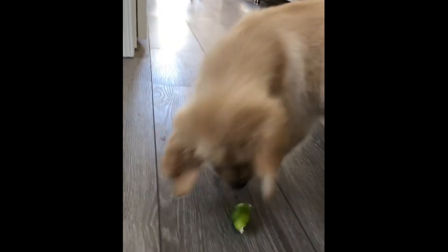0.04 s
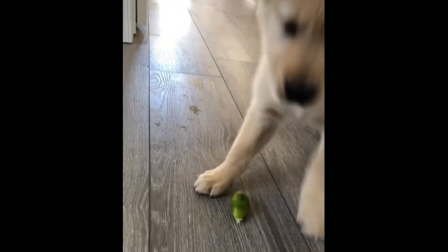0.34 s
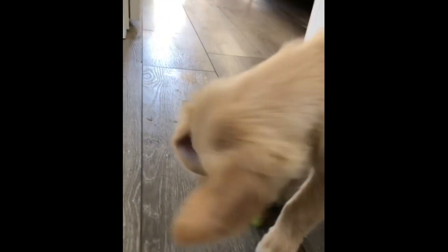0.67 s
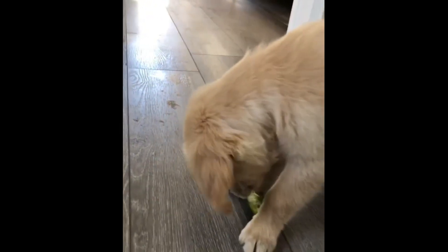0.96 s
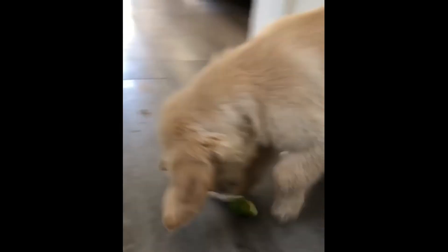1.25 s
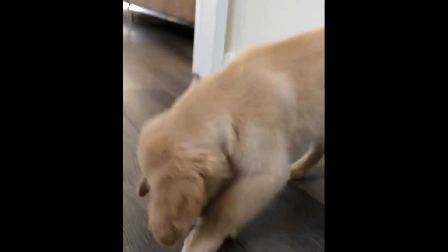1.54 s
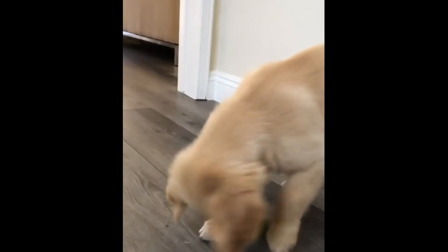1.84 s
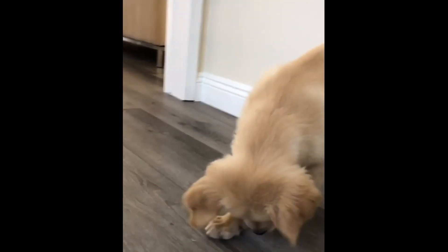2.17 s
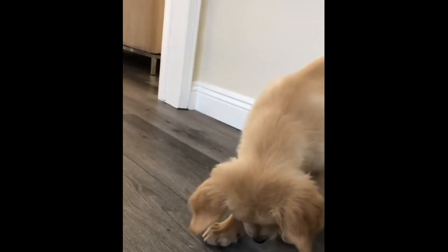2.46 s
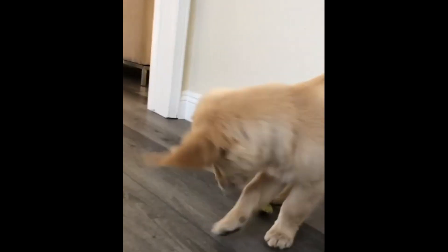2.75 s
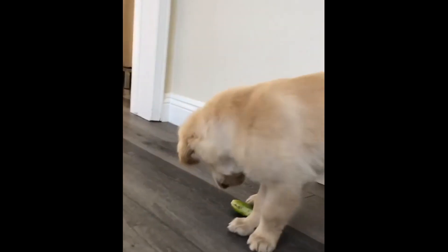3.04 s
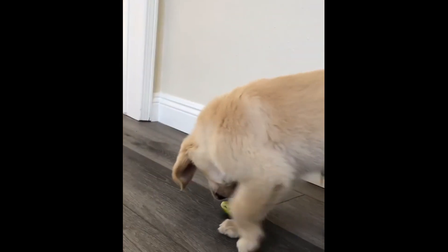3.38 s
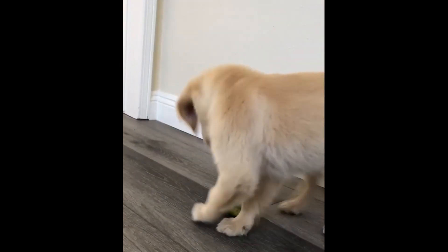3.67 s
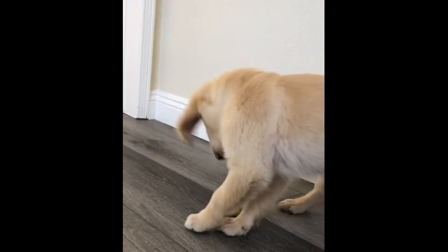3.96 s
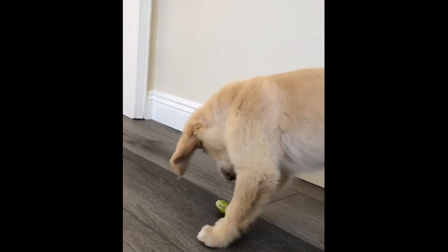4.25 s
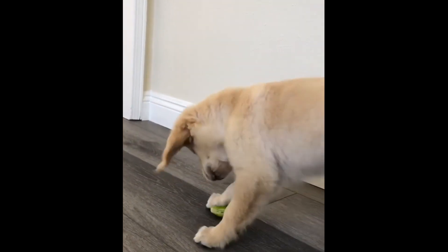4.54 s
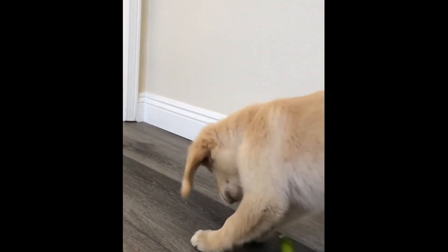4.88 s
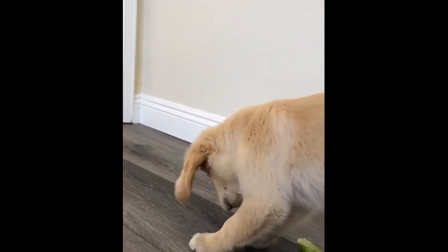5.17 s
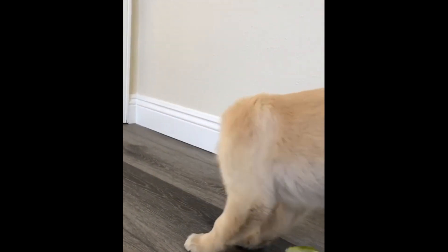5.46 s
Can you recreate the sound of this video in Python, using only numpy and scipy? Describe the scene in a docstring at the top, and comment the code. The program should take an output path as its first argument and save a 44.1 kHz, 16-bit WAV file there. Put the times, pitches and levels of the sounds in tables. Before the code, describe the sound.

A puppy paws and pounces on a hard plank floor close to the microphone. Its claws click in irregular clusters, mixed with short gritty scrapes, soft knocks on the boards and faint brushing of pads and fur. The activity thins out in the middle, then picks up again with more taps and scratches. The bare room rings for about a second, over a faint low rumble and hum.

```python
"""A bare, echoing room with a hard plank floor, one microphone close to a puppy pawing at a piece of
vegetable. Its claws tick down toe after toe and rake over the wood grain in stick-slip bursts; soft
blows draw short falling chirps from the planks. Between the pounces, pads and fur scuff faintly.
The room rings on for about a second, and behind it all lie a low rumble and a mains hum."""
import sys
import numpy as np
from scipy import signal
from scipy.fft import rfft, irfft, next_fast_len
from scipy.io import wavfile
from scipy.ndimage import map_coordinates

SR = 44100
rng = np.random.default_rng(int(sys.argv[2]) if len(sys.argv) > 2 else 0)


def bounce(signal):
    """Save signal as a 16-bit WAV file at the path given by the first command-line argument."""
    frames = np.transpose(np.atleast_2d(signal))
    limited = np.clip(frames, -1, 1)
    pcm = np.round(limited * 32767).astype(np.int16)
    wavfile.write(sys.argv[1], SR, pcm)


N = 247401


# The colour of a claw on wood, heard close. Each row: frequency in Hz, level in dB.
CLAW_COLOUR = [(100, -25.5), (400, -11), (590, -10), (800, -3.5), (1600, -2.5), (3000, -1.5), (5000, 0),
               (7500, -0.5), (11000, -3), (14000, -9)]
# Claws set down hard near the microphone. Each row: start in seconds, level in dB, relative treble in dB.
CLAW_TAPS = [(0.2103, -30, -13), (0.2152, -24.5, -13.5), (0.2543, -24.5, -14), (0.29, -32.5, -26),
             (0.4753, -38, -22), (0.5503, -33.5, -18), (0.722, -37.5, -14.5), (0.7912, -49, -16),
             (0.8759, -53.5, -29), (1.2489, -24.5, -3), (1.2694, -30, -11), (1.2866, -20.5, -15),
             (1.3134, -27, -13), (1.6041, -27, -11.5), (1.7126, -32, -8), (1.7632, -26.5, -14),
             (1.7681, -25, -10.5), (1.9487, -30, -19), (2.085, -35, -14), (2.0954, -31, -12.5),
             (2.9437, -41, -19), (3.2485, -45.5, -19.5), (3.341, -53, -25), (3.445, -50.5, -16),
             (3.468, -43.5, -13.5), (3.6378, -22, -15), (3.7804, -33, -12), (3.8017, -29, -18.5),
             (4.1295, -46, -9), (4.148, -38.5, -17.5), (4.2621, -29.5, -18), (4.542, -34, -2),
             (4.5628, -26, 1), (4.6556, -34.5, -16), (4.6864, -26.5, -13.5), (4.7029, -26, -14.5),
             (4.8228, -26.5, -10), (4.8575, -28.5, -16)]

def taps(crest_db=10, neutral_treble_db=-13, treble_octaves=1.17, delay_s=.001,
         toe_gap_s=.0014, toe_loss_db=10.5):
    """Three toes tick in turn, each one softer."""
    out = np.zeros(N)
    for start, level_db, treble_db in CLAW_TAPS:
        tilt_db = (treble_db - neutral_treble_db) / treble_octaves
        snap = contact(CLAW_COLOUR, tilt_db, plank_note(start), plank_db=-2.5, width_hz=330, knee_hz=3030)
        for toe in range(3):
            sound = tick(snap, grit_db=-6, grit_t60=0.0014, chatter_db=-16.5, chatter_t60=0.027)
            gain = amp(level_db - crest_db - toe * toe_loss_db)
            add(out, start + delay_s + toe * toe_gap_s, gain * sound)
    return out


def tick(snap, grit_db, grit_t60, chatter_db, chatter_t60):
    """A claw lands with a gritty tick and chatters briefly; the first millisecond has rms 1."""
    t = np.arange(SR // 25) / SR
    grit = amp(grit_db - 60 * t / grit_t60)
    chatter = amp(chatter_db - 60 * t / chatter_t60)
    force = (grit + chatter) * rng.standard_normal(len(t))
    force[0] = 1  # the first touch
    sound = signal.fftconvolve(force, snap)
    return sound / np.sqrt(np.mean(sound[:SR // 1000] ** 2))


RAKE_EDGE_DB = -7  # pressure at both ends of a rake, relative to its crest
# Claws dragged over the grain, close by. Each row: start in seconds, length in seconds, place of the
# crest from 0 to 1, level in dB, tilt in dB per octave, level of the catches above the rake in dB.
CLAW_RAKES = [ (0.211, 0.0098, 0.3, -48.5, -6.5, -10), (0.228, 0.051, 0.57, -47, -3.5, 7),
              (0.517, 0.051, 0.6, -61.5, -1.5, 5), (1.15, 0.14, 0.97, -60, -5, 4.5),
              (1.24, .022, 0.57, -47.5, -3, -7), (1.264, 0.08, 0.41, -35, 0.27, -3.5),
              (1.662, 0.11, 0.4, -53, -7, 13.5), (1.761, .047, .6, -42, -3, 2),
              (3.637, 0.0064, 0.3, -36.5, 1.5, 0), (3.647, 0.044, 0.13, -42.5, 0.5, -2),
              (4.535, 0.022, 0.54, -51.5, -5.5, -1), (4.562, 0.046, 0.02, -46, -3, 7.5),
              (4.642, 0.12, 0.08, -53, -5, 3), (4.778, 0.062, 0.36, -54.5, -3, 5),
              (4.817, 0.054, .36, -44.5, -1, 3.5), ]

def rakes():
    """Claws stick and slip on the embossed grain, hundreds of times a second."""
    return slides(CLAW_RAKES, CLAW_COLOUR, plank_db=2.0, slips_hz=650, spread_db=3.8, hiss_db=-9,
                  edge_db=RAKE_EDGE_DB)


def catches(grooves_hz=144.5, jitter=.2, scatter_db=2, bright_db=1, bright_per_db=0.74, count=32):
    """A raking claw ticks in groove after groove with the paw's pressure; harder catches are brighter."""
    out = np.zeros(N)
    for start, length, crest, db, tilt_db, catch_db in CLAW_RAKES:
        spacing, sizes = np.clip(rng.standard_normal((2, count)), -2, 2)
        gaps = np.exp(jitter * spacing) / grooves_hz
        ages = np.cumsum(gaps) - gaps[0]
        levels = db + catch_db + pressure_db(ages / length, crest, RAKE_EDGE_DB) + scatter_db * sizes
        catch_tilt_db = tilt_db + bright_db + bright_per_db * catch_db
        snap = contact(CLAW_COLOUR, catch_tilt_db, plank_note(start), plank_db=-2, width_hz=230)
        for age, level in zip(ages, levels):
            sound = tick(snap, grit_db=-6, grit_t60=.0012, chatter_db=-28, chatter_t60=.02)
            add(out, start + age, (age < length) * amp(level) * sound)
    return out


# Soft blows on the nearby planks. Each row: start in seconds, level in dB, middle pitch in Hz.
PLANK_BLOWS = [(.290, -30.5, 952), (0.437, -45, 830), (.476, -42, 994), (0.478, -43, 473),
               (.520, -41.5, 694), (.550, -45.5, 780), (1.605, -44.5, 840), (1.671, -42.5, 770),
               (1.857, -45.5, 710), (2.193, -40.5, 628), (3.730, -34, 1090), (3.936, -51, 645),
               (4.2615, -47, 1094), (4.597, -45, 1050), (4.615, -42, 1000)]

def knocks(gain_db=-1.0, cycles=5.59, fall_hz=620, rough=0.27, grain_hz=900):
    """Higher bending waves cross a plank faster, so a blow arrives as a falling chirp."""
    out = np.zeros(N)
    for start, db, middle_hz in PLANK_BLOWS:
        length = cycles / middle_hz
        place = np.linspace(0, 1, int(length * SR))
        pitch_hz = middle_hz * np.exp(fall_hz / middle_hz * (.5 - place))
        phase = 2 * np.pi * np.cumsum(pitch_hz) / SR
        # joints between planks scatter the wave, which makes it uneven
        swell, drift = wobbles(place * length * grain_hz, count=32)
        wave = (1 + rough * swell) * np.sin(phase + rough * drift)
        add(out, start, amp(db + gain_db) * wave * np.sin(np.pi * place))
    return out


# The colour of a soft pad on wood. Each row: frequency in Hz, level in dB.
PAD_COLOUR = [(100, -22), (400, -0.5), (800, 4.5), (1600, 2.5), (2800, -2.5), (5000, -10.5), (8000, -20),
              (14000, -31.5)]
# Scuffs and rubs, faint even this close. Each row: start in seconds, length in seconds,
# place of the crest from 0 to 1, level in dB, tilt in dB per octave.
PAD_SCUFFS = [ (0.360, 0.094, 0.8, -67, 14), (0.900, 0.32, 0.9, -75, 7.5), (1.615, 0.038, 0.9, -57.5, 1.5),
              (1.980, 0.15, 0.33, -60, 1.5), (2.090, 0.039, 0.36, -51, 4.5),
              (2.210, 0.085, 0.3, -64.5, 2.5), (2.340, 0.04, 0.1, -57.5, 1.5), (2.583, .023, 0, -62.5, 2.5),
              (2.625, 0.05, 0.53, -69.5, 0.5), (2.743, 0.021, 0.3, -66.5, 3),
              (3.690, 0.084, 0.35, -48.5, 2.3), (3.805, 0.058, 0.5, -57, 5), (4.040, 0.11, 0.7, -68, 11.5),
              (4.172, 0.085, 0.82, -60.5, 5), ]

def scuffs():
    """Pads and fur brush the floor with a finer, duller friction that fades in and out."""
    return slides(PAD_SCUFFS, PAD_COLOUR, plank_db=3.5, slips_hz=1183, spread_db=0.5, hiss_db=-5.0,
                  edge_db=-9)


def slides(table, colour, plank_db, slips_hz, spread_db, hiss_db, edge_db):
    """Feet slide over the grain: every slip is a small contact with the plank."""
    out = np.zeros(N)
    for start, length, crest, db, tilt_db, *_ in table:
        force = stroke(length, crest, slips_hz, spread_db, hiss_db, edge_db)
        snap = contact(colour, tilt_db, plank_note(start + crest * length), plank_db, width_hz=330)
        add(out, start, amp(db) * signal.fftconvolve(force, snap / np.linalg.norm(snap)))
    return out


def stroke(length, crest, slips_hz, spread_db, hiss_db, edge_db, softness=0.083, count=1024):
    """The force of a sliding foot: slips of uneven spacing and size over fine friction."""
    n = int(max(length, .004) * SR)
    onsets = np.cumsum(rng.gamma(2, .5, count)) * SR / slips_hz
    sizes = amp(spread_db * np.clip(rng.standard_normal(count), -2, 2))
    slips = np.bincount(onsets[onsets < n].astype(int), sizes[onsets < n], n)
    friction = amp(hiss_db) * rng.standard_normal(SR // 2)[:n]
    place = np.linspace(0, 1, n)
    touch = np.abs(np.sin(np.pi * place)) ** softness  # the foot settles and lifts off
    return unit((unit(slips) + friction) * touch * amp(pressure_db(place, crest, edge_db)))


def pressure_db(place, crest, edge_db):
    """A stroke presses harder up to its crest, then eases off; place runs from 0 to 1."""
    return np.interp(place, [0, np.clip(crest, .02, .98), 1], [edge_db, 0, edge_db])


def contact(colour, tilt_db, plank_hz, plank_db, width_hz, knee_hz=1000, lag_s=.0012, size=1024):
    """One tiny impact: a snap and the plank's short ring, the lower tones arriving a little later."""
    hz = np.fft.rfftfreq(size, 1 / SR)
    octaves = np.log2(np.clip(hz, knee_hz, 10000) / 4000)
    spectrum = amp(along(colour, hz) + tilt_db * octaves)
    # minimum phase: nothing sounds before the touch
    cepstrum = irfft(np.log(spectrum))
    cepstrum[1:size // 2] *= 2
    cepstrum[size // 2 + 1:] = 0
    # bending waves: travel time falls with the root of frequency, scaled by lag_s at 1 kHz
    turns = lag_s * (2 * np.sqrt(1000 * hz) - hz * np.sqrt(1000 / hz[-1]))
    snap = np.exp(rfft(cepstrum) - 2j * np.pi * turns)
    ring = 1j * hz * width_hz / (plank_hz ** 2 - hz ** 2 + 1j * hz * width_hz)
    return irfft(snap * (1 + amp(plank_db) * ring))


# The floor under the paws as the puppy moves about. Each row: time in seconds, pitch in Hz.
PLANK_NOTES = [(.3, 895), (1.3, 860), (1.66, 770), (1.79, 1050), (2.0, 795), (2.7, 876), (3.65, 1150),
               (4.25, 1040), (4.6, 1000)]

def plank_note(time_s):
    """The pitch at which the floor rings where the paws are."""
    return np.interp(time_s, *np.transpose(PLANK_NOTES))


# How long the bare room rings. Each row: frequency in Hz, time to fall 60 dB in seconds.
ECHO_DECAY = [(200, 0.36), (500, 1.03), (1100, 1.27), (3000, 0.93), (7000, 0.97), (10000, 0.64),
              (13500, 0.24)]
# The colour of that ring at the microphone. Each row: frequency in Hz, level in dB.
ECHO_COLOUR = [(200, 12.5), (650, -0.5), (1100, 0), (2500, 2), (7000, -0.5), (10000, 2.5), (13500, 5.5)]

def room(paws, tail_db=-8, early_db=-14, early_t60=0.26, build_s=0.0009):
    """Near walls answer at once; the bare room rings on for about a second."""
    out = np.zeros(N)
    step = SR // 10  # a fresh echo every tenth of a second keeps the room's ring smooth
    age = np.arange(SR) / SR
    build = 1 - np.exp(-age / build_s)
    for first in range(0, N, step):
        hz, t, noise = signal.stft(rng.standard_normal(SR), SR, nperseg=256)
        decay = amp(along(ECHO_COLOUR, hz)[:, None] - 60 * t / along(ECHO_DECAY, hz)[:, None])
        tail = signal.istft(noise * decay, SR, nperseg=256)[1][:SR] * build
        early = rng.standard_normal(SR) * amp(-60 * age / early_t60) * build
        answer = amp(tail_db) * tail / np.linalg.norm(tail) + amp(early_db) * early / np.linalg.norm(early)
        add(out, first / SR, signal.fftconvolve(paws[first:first + step], answer))
    return out


# Room tone at the microphone. Each row: frequency in Hz, relative level in dB.
AIR_COLOUR = [(15, -48), (25, -22), (40, -8), (64, -9), (207, -12.5), (344, -23.5), (529, -22.5),
              (790, -27.5), (1030, -32), (2020, -35), (2560, -38.5), (2850, -39), (6720, -43), (13500, -50),
              (15000, -71)]

def room_tone(level_db=-64, low_cut_hz=45):
    """The still house gives a low rumble and a thin hiss."""
    noise = rng.standard_normal(N)
    air = filtered(noise, lambda hz: amp(along(AIR_COLOUR, hz)) * hz ** 6 / (hz ** 6 + low_cut_hz ** 6))
    return amp(level_db) * unit(air)


# An appliance in the background. Each row: frequency in Hz, typical rms level in dB.
HUM_TONES = [(59, -70), (118, -84), (147, -75), (200, -76.5)]

def mains_hum(waver_db=3.0, wander_turns=0.18, waver_hz=9):
    """An appliance hums, each tone wavering in level and phase."""
    out = np.zeros(N)
    t = np.arange(N) / SR
    for hz, db in HUM_TONES:
        swell, drift = wobbles(t * waver_hz, count=64)
        tone = np.sin(2 * np.pi * (hz * t + wander_turns * drift))
        out += np.sqrt(2) * amp(db + waver_db * swell) * tone
    return out


def wobbles(position, count):
    """Two smooth curves, each through count random points, read at position."""
    return [map_coordinates(rng.standard_normal(count), [position]) for _ in range(2)]


def amp(db):
    """Decibels to gain."""
    return 10 ** (np.asarray(db) / 20)


def unit(x):
    """x at rms 1."""
    return x / np.sqrt(np.mean(x ** 2) + 1e-20)


def along(points, hz):
    """Read (Hz, value) points on a log frequency axis."""
    freqs, values = np.transpose(points)
    return np.interp(np.log(hz + 1), np.log(freqs), values)


def add(track, start_s, sound):
    """Mix a sound into a track at start_s."""
    part = track[max(round(start_s * SR), 0):][:len(sound)]
    part += sound[:len(part)]


def filtered(x, gain):
    """x times a gain that depends on frequency."""
    size = next_fast_len(N + SR // 2)
    hz = np.fft.rfftfreq(size, 1 / SR)
    return irfft(rfft(x, size) * gain(hz), size)[:N]


def scene():
    """The paws close up, their echo around them and the house behind, in mono."""
    paws = taps() + rakes() + catches() + scuffs() + knocks()
    return (paws + room(paws) + room_tone() + mains_hum())[None]


def record(dry, top_hz=14100):
    """The recorder keeps nothing above its band limit."""
    return filtered(dry[0], lambda hz: 1 / np.sqrt(1 + (hz / top_hz) ** 160))[None]


dry = scene()
out = record(dry)
bounce(out)
```